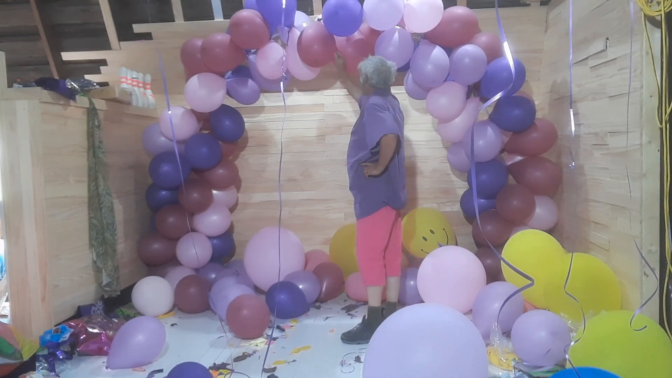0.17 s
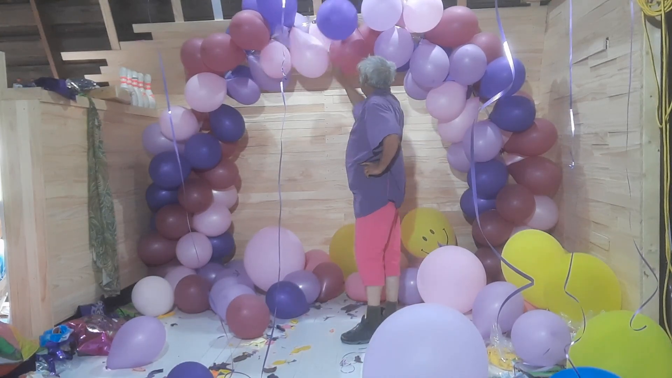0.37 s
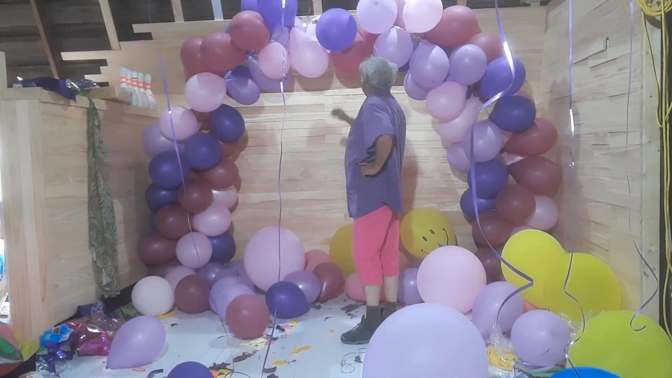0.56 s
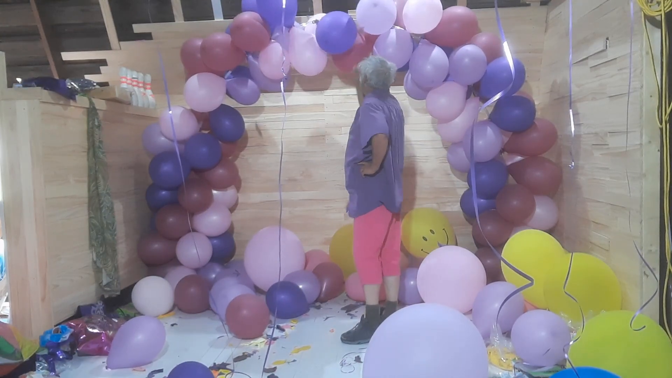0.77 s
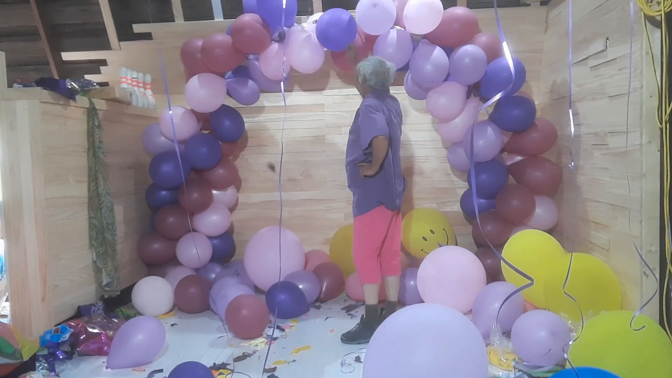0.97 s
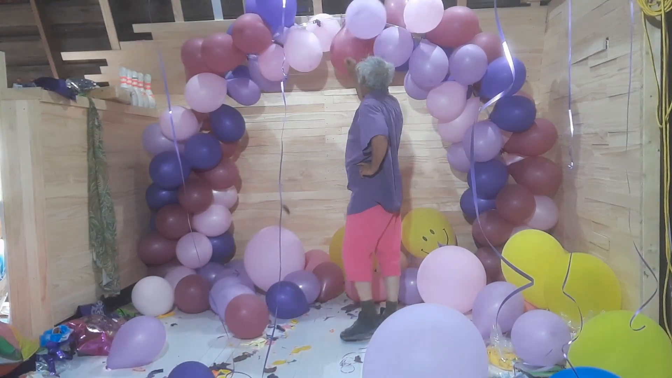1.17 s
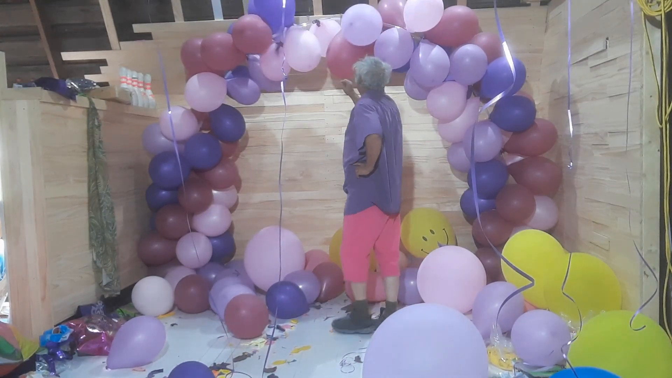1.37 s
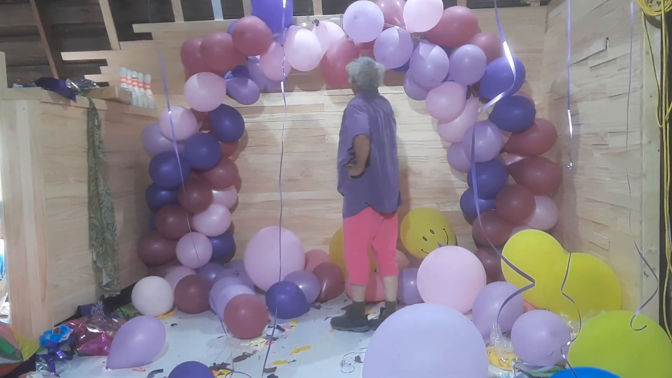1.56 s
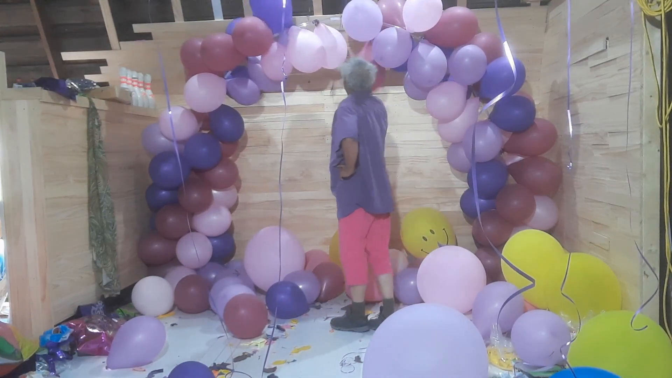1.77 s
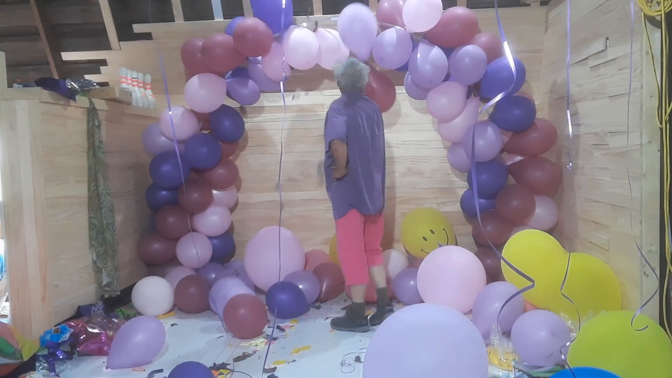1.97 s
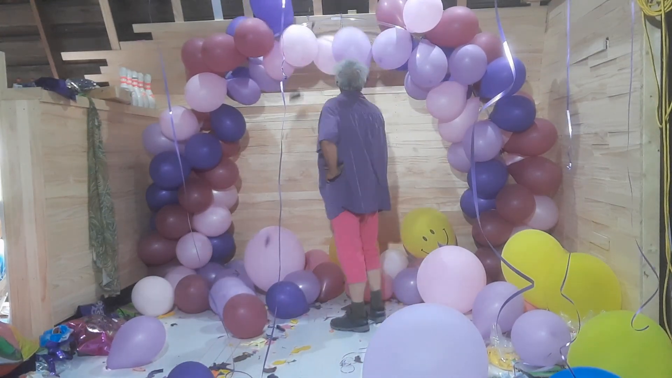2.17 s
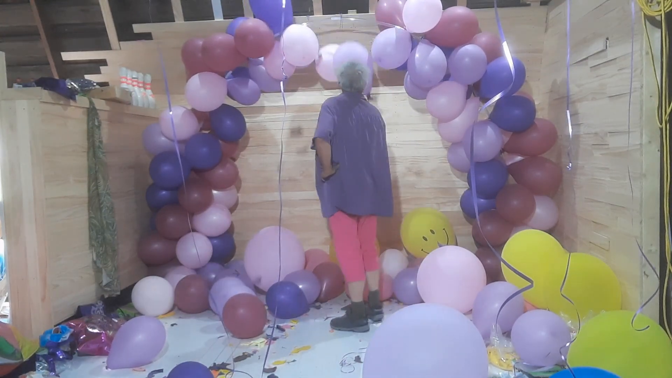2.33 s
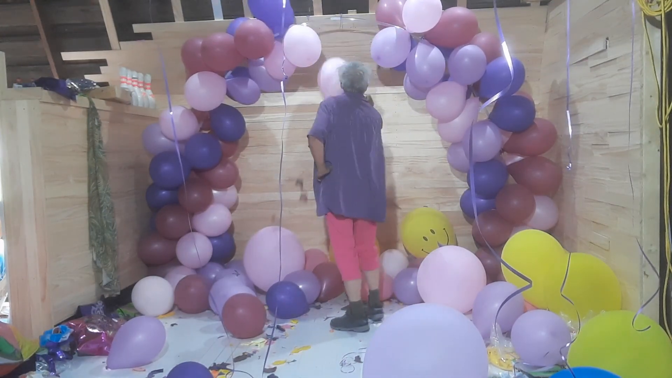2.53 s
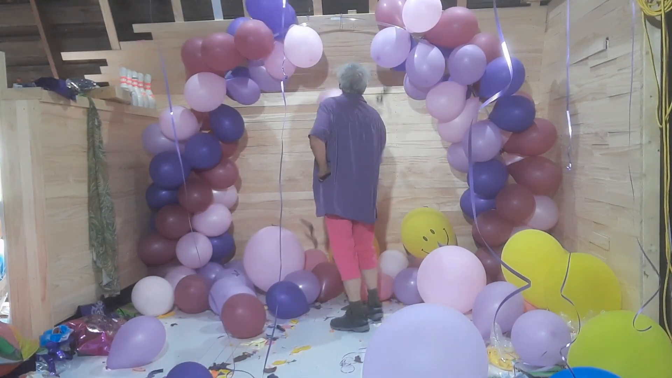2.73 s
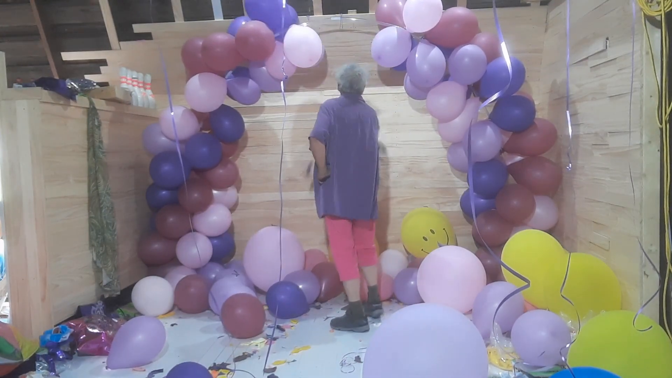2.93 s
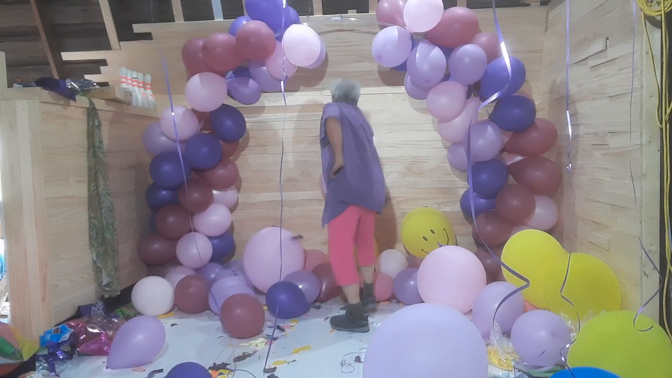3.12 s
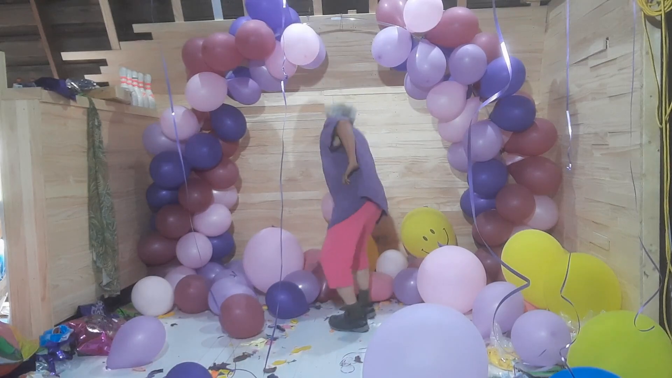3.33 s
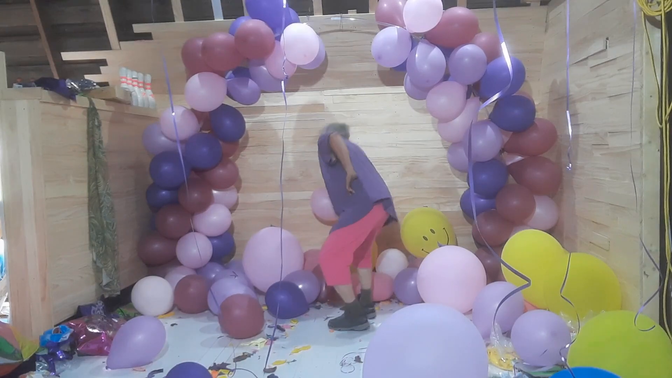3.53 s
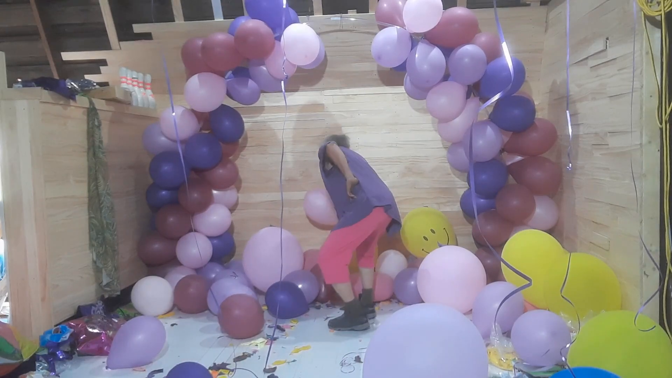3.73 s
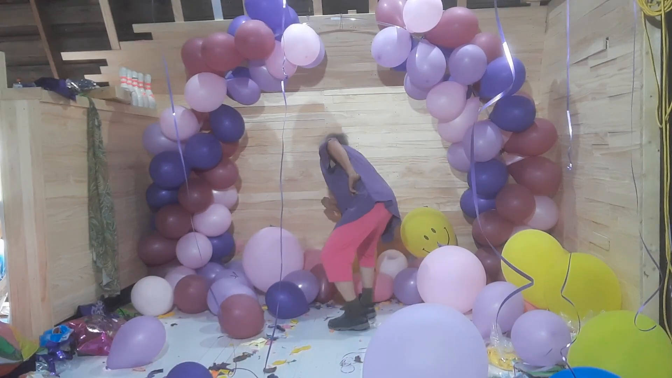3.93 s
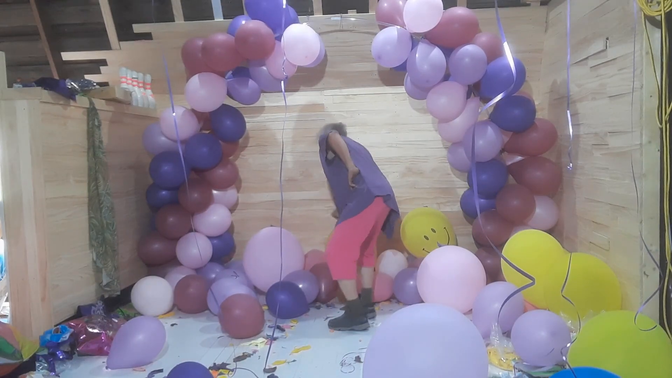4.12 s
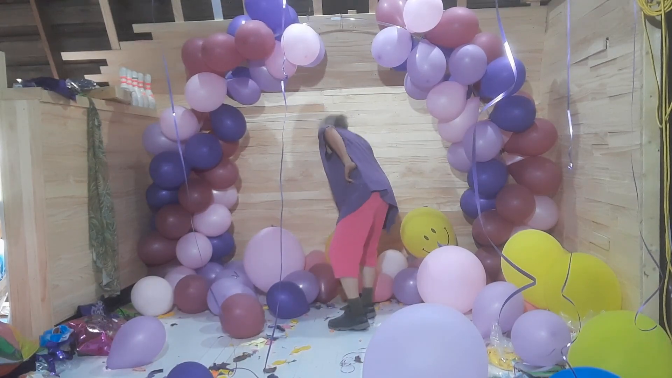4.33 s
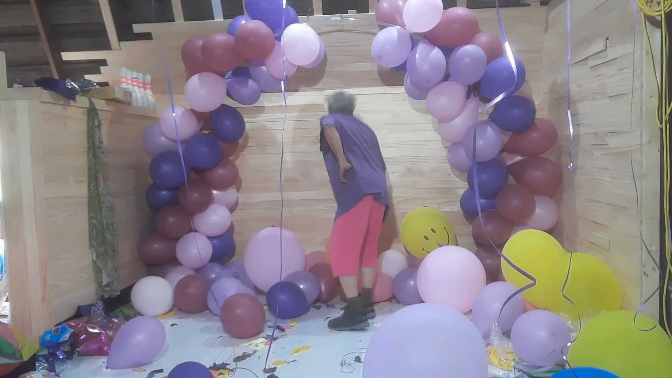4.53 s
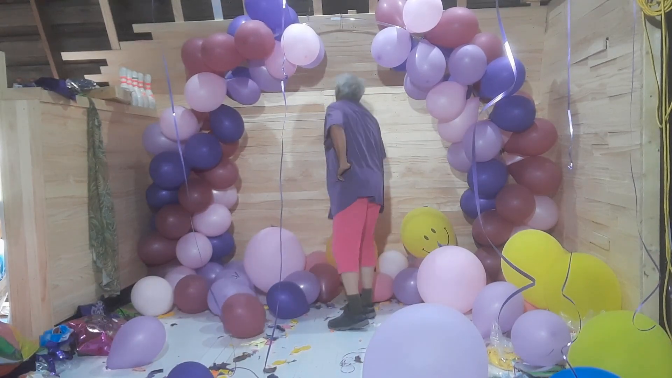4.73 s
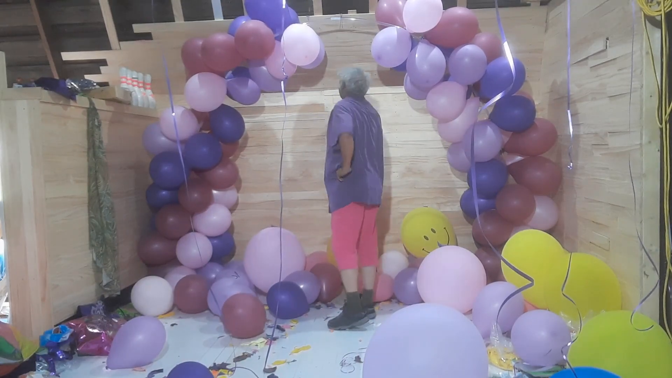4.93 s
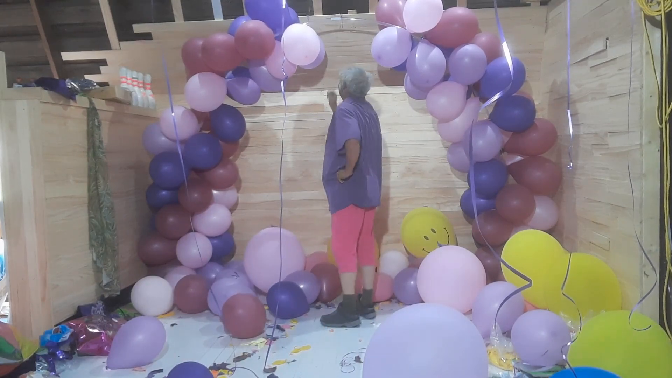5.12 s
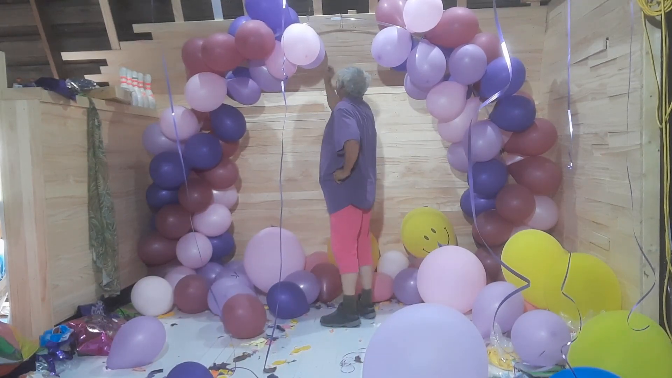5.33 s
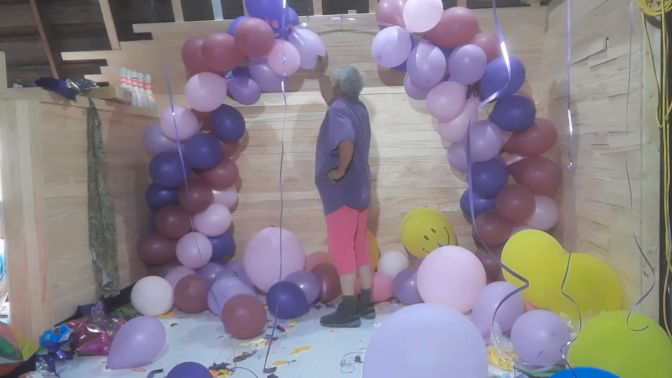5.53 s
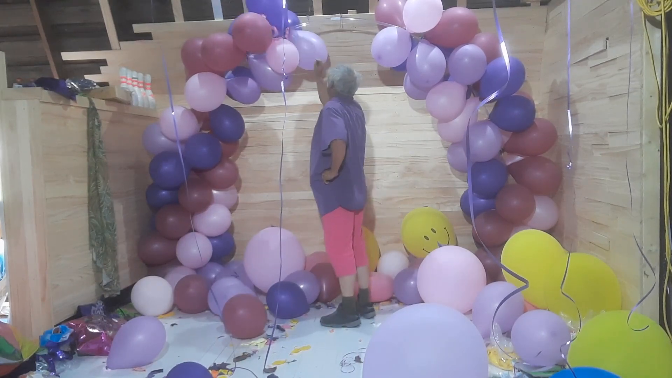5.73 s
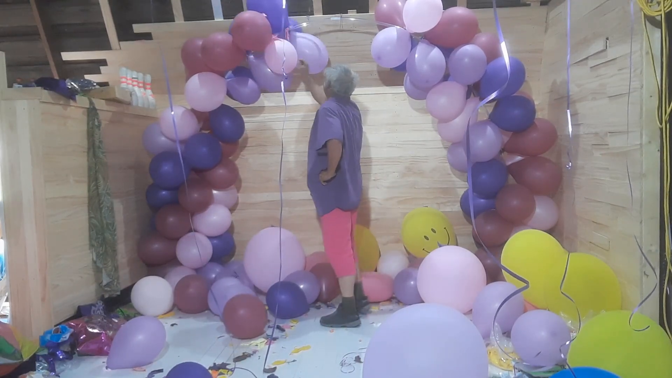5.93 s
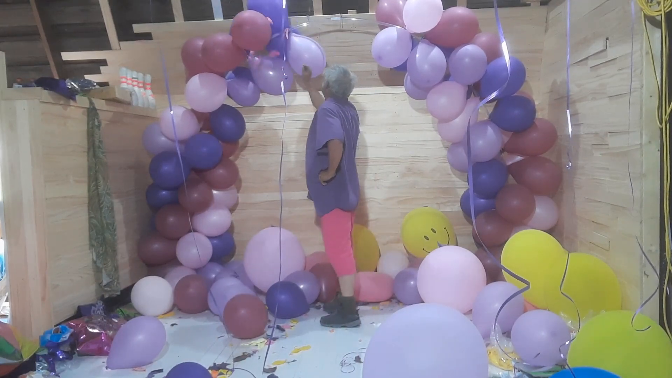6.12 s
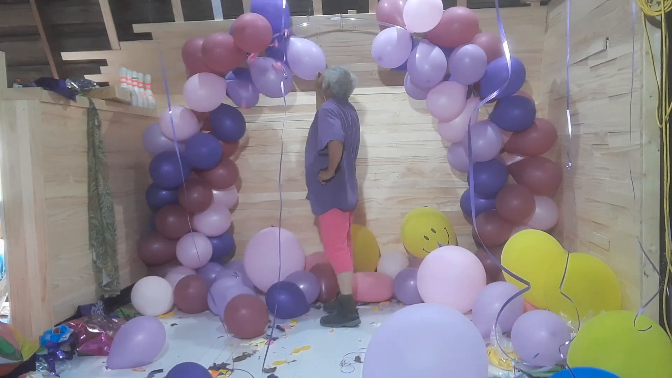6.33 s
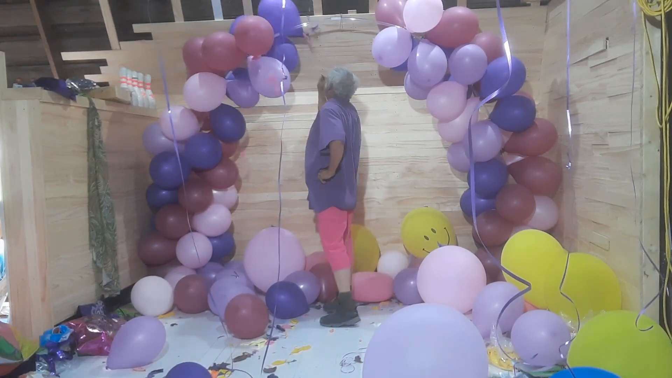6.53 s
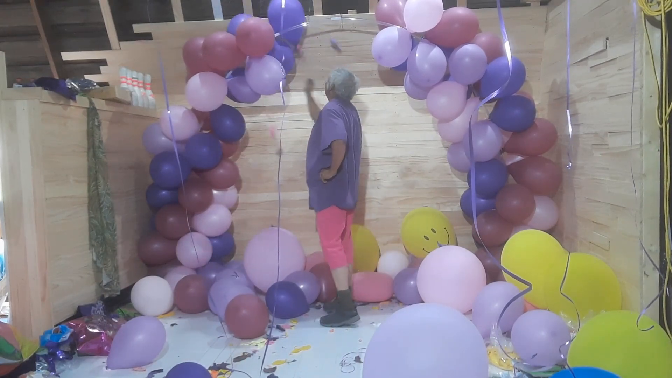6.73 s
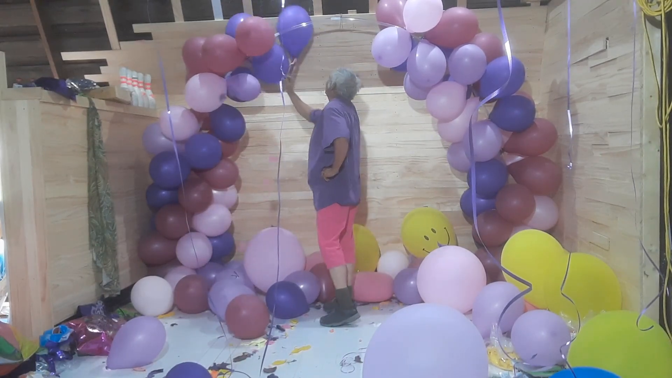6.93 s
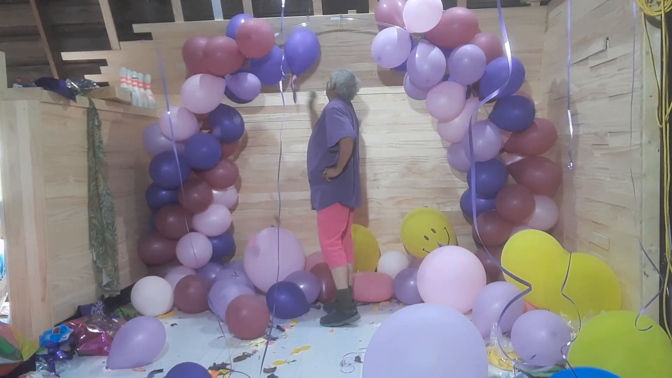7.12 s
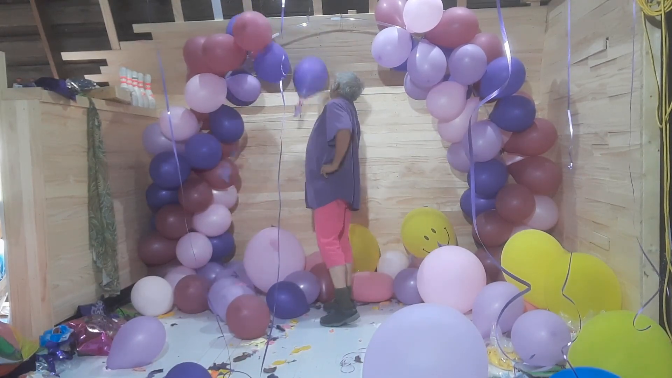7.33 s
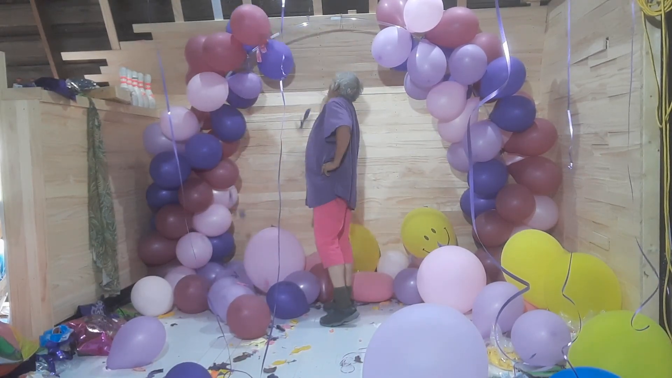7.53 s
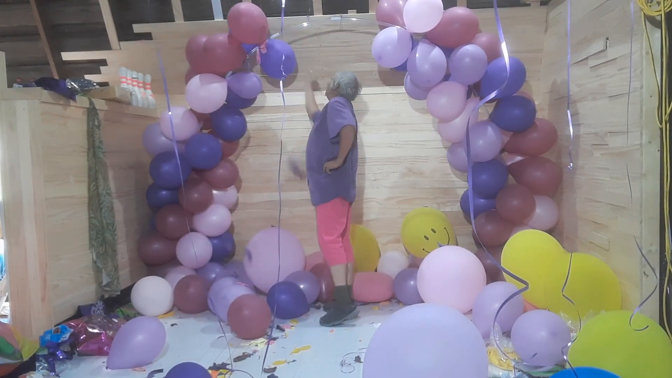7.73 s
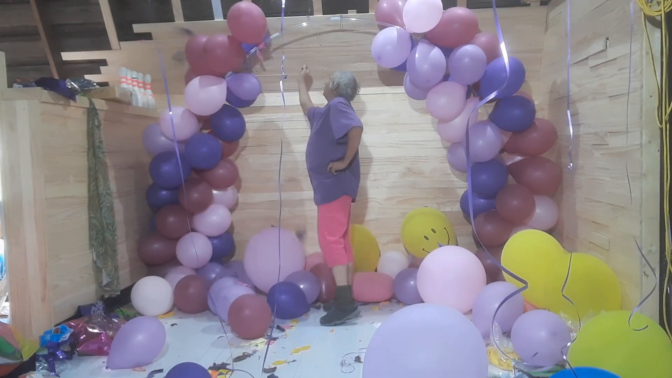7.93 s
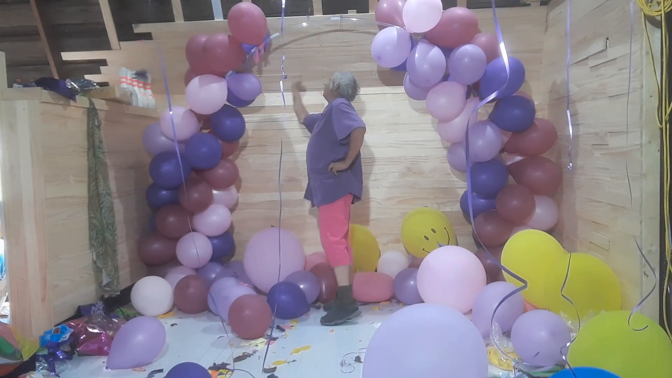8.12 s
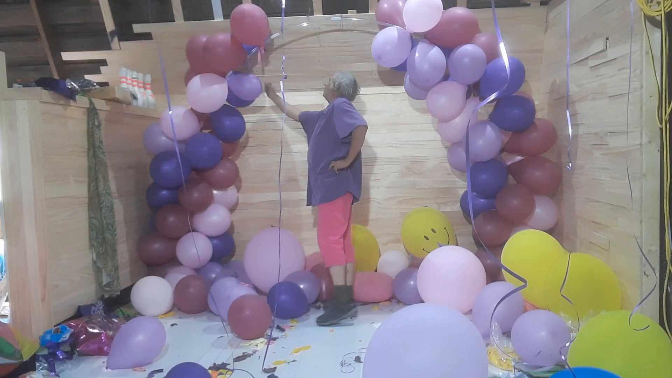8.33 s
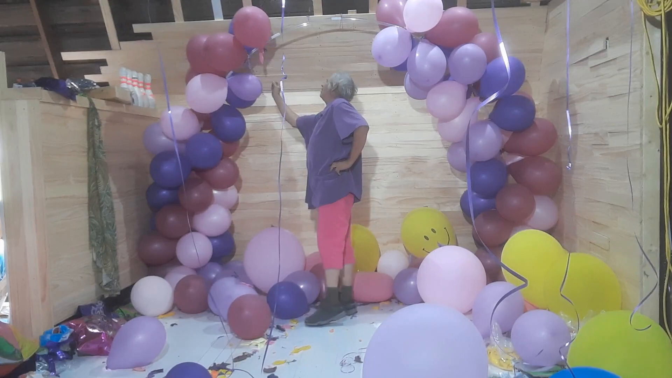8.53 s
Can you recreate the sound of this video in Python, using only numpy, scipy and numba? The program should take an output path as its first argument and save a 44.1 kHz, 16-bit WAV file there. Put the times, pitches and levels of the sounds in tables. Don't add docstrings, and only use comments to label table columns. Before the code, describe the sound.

A very quiet wooden room with faint hiss; a boot shifts with a soft low rumble and brush at 0.0 s. Balloons burst with loud, sharp bangs at 0.3, 1.1, 1.7, 2.3 and 2.6 s, each a punch of air and a few milliseconds of tearing crack, echoing for about half a second while the garland shivers and rustles. From 3.2 to 3.9 s boots and loose balloons knock, scuff and squeak; at 3.9 s a pop coincides with a heavy floor boom. A quieter gap follows, with dull knocks near 4.9 and 5.2 s. Bangs resume at 5.6 s, a much weaker pop at 6.1 s with a knock and low rumbling, then full ones at 6.5, 6.9, 7.4 and 7.9 s. Slight rubbing and a soft humming balloon nudge at 8.45 s end it. The distant stereo phone compresses the bangs and clips the echo tails.

```python
import sys
import numpy as np
from scipy import signal
from scipy.fft import rfft, irfft, next_fast_len
from scipy.io import wavfile
from scipy.ndimage import uniform_filter1d
from numba import njit

SR = 44100
rng = np.random.default_rng(int(sys.argv[2]) if len(sys.argv) > 2 else 0)


def waveform_to_disk(signal):
    frames = np.transpose(np.atleast_2d(signal))
    scaled = np.clip(frames, -1, 1) * 32767
    samples = np.round(scaled).astype(np.int16)
    wavfile.write(sys.argv[1], SR, samples)


def rack_gain(trim_db):
    fader = np.asarray(trim_db, float)
    return 10 ** (fader / 20)


N = 382788
LEAD_IN = 256
ECHO_LEN = next_fast_len(int(.9 * SR))
ECHO_HZ = np.arange(ECHO_LEN // 2 + 1) * SR / ECHO_LEN


def on_log(table, hz):
    f, value = np.transpose(table)
    return np.interp(np.log(np.maximum(hz, 1)), np.log(f), value)


def band(x, lo_hz, hi_hz):
    return signal.sosfilt(signal.butter(2, [lo_hz, min(hi_hz, .45 * SR)], "band", fs=SR, output="sos"), x)


def swell(s, hold_s, db, rise_db_s, fall_db_s):
    t = np.arange(N) / SR
    power = 0
    for start, hold, level_db in zip(s, hold_s, db):
        climb_db = rise_db_s * np.maximum(start - t, 0)
        sink_db = fall_db_s * np.maximum(t - start - hold, 0)
        power = power + rack_gain(level_db - climb_db - sink_db) ** 2
    return np.sqrt(power)


# f/Hz, share
PORT_LIKENESS = [(30, .8), (60, .87), (130, .93), (290, .93), (600, .78), (1200, .55), (2500, .55),
                 (5000, .48), (9000, .4), (14000, .35)]
# f/Hz, phase/rad
PORT_LEAD = [(0, 0), (690, .1), (2070, 2.9), (4310, 8.7), (4820, 8.4), (5770, 13.2), (22050, 44)]
# f/Hz, level/dB
PORT_TILT = [(60, -1), (200, 0), (380, -1), (700, -4.5), (1290, -1.5), (2400, .5), (4400, 1.5), (8100, 4),
             (13000, 8.5)]


def ports(own, other):
    hz = np.arange(len(own)) * SR / 2 / (len(own) - 1)
    like = np.clip(on_log(PORT_LIKENESS, hz), 0, 1)
    late = np.exp(-1j * np.interp(hz, *np.transpose(PORT_LEAD)))
    tilt = rack_gain(on_log(PORT_TILT, hz) / 2)
    right = like * own * late + np.sqrt(1 - like ** 2) * other
    return np.array([own * tilt, right / tilt])


# f/Hz, t/s
ROOM_T60 = [(60, .5), (160, 0.55), (420, 0.4), (1100, 0.48), (2900, 0.48), (7700, 0.4), (14000, 0.26)]


def room(colour_db, build_s, sparse_db, sparse_s):
    t = np.arange(ECHO_LEN) / SR
    uneven = rack_gain(sparse_db * np.exp(-t / sparse_s) * rng.exponential(size=ECHO_LEN))
    uneven = uneven / np.sqrt(uniform_filter1d(uneven ** 2, size=900))
    echoes = ports(*rfft(rng.standard_normal((2, ECHO_LEN)) * uneven)) * rack_gain(colour_db)
    out = 0
    for octave in range(-4, 6):
        share = np.clip(1 - np.abs(np.log2(np.maximum(ECHO_HZ, 1) / 500) - octave), 0, 1)
        decay = rack_gain(-60 * t / on_log(ROOM_T60, 500 * 2. ** octave))
        out = out + irfft(echoes * share, ECHO_LEN) * decay
    mute = np.exp(-(t / .5) ** 4)
    return out * (1 - np.exp(-(t / build_s) ** 2)) * mute


def swing(t, hz, cycles):
    u = t * hz / cycles
    return u ** 2 * np.exp(2 - 2 * u) * np.sin(2 * np.pi * hz * t)


def place(out, s, pan_db, straight, echoes):
    near = ports(rfft(straight, ECHO_LEN), rfft(np.roll(straight, 9), ECHO_LEN))
    near = irfft(near, ECHO_LEN)
    pan = rack_gain(np.array([[pan_db], [-pan_db]]) * .25)
    heard = np.roll(near + echoes, LEAD_IN, axis=1)[:, :-4096] * pan
    return out + np.pad(heard, ((0, 0), (int(s * SR) - LEAD_IN, N)))[:, :N]


def grainy(modes, grain_db, flutter_db, rate):
    grains = rng.standard_normal((2, N)) * rack_gain(grain_db * rng.exponential(size=N))
    rung = sum(rack_gain(db) * band(grains, f - w / 2, f + w / 2) for f, w, db in modes)
    k = int(SR / rate)
    walk = uniform_filter1d(np.repeat(rng.standard_normal(N // k + 1), k), k)[:N]
    both = irfft(ports(*rfft(rung * rack_gain(flutter_db * walk))), N)
    return both / np.sqrt(np.mean(both ** 2))


# f/Hz, width/Hz, level/dB
MIC_HISS = [(9000, 3500, -1.5), (5200, 60, -12.5), (13000, 5000, -6), (3500, 6000, -8.5), (570, 300, -10.5)]


def noise_floor():
    hum = grainy([(118, 8, 0)], 1.5, 1.5, rate=4) * rack_gain(-94.5)
    return hum + rack_gain(-86) * grainy(MIC_HISS, .3, .7, rate=12)


def shiver():
    s, db = np.transpose(POPS)[:2]
    return swell(s + .01, 0 * s, db - 47.5, rise_db_s=1e4, fall_db_s=54)


# t/s, hold/s, level/dB
BRUSHES = [(0.024, 0.066, -59.5), (.15, .14, -73), (.7, 0.33, -82.5), (1.499, 0.18, -80), (3.003, .18, -85),
           (3.206, 0.029, -64), (3.303, 0.32, -70), (3.73, 0.14, -70.5), (4.38, .18, -78.5),
           (4.94, 0.046, -71.5), (4.999, .55, -77.5), (6.04, 0.036, -71), (8.414, 0.061, -69),
           (8.549, 0.11, -82.5)]
# f/Hz, width/Hz, level/dB
BRUSH_HISS = [(5200, 200, -2), (5900, 400, -5), (5600, 5600, -9), (8800, 2400, -3), (11300, 3600, -11)]


def brushing():
    brush = swell(*np.transpose(BRUSHES), rise_db_s=700, fall_db_s=151)
    return (brush + rack_gain(-9) * shiver()) * grainy(BRUSH_HISS, 1.5, 1.3, rate=6)


# t/s, hold/s, level/dB
HUMS = [
    (.84, .08, -73),
    (8.452, .018, -61),
]


def balloon_hum():
    nudge = swell(*np.transpose(HUMS), rise_db_s=900, fall_db_s=500)
    return nudge * np.sin(2 * np.pi * 453 * np.arange(N) / SR)


# t/s, hold/s, rumble level/dB, loose rubber pushed along over rumble/dB
TREADS = [(0.02, 0.054, -51, -23), (0.145, 0.27, -70, -17), (0.92, .06, -77.5, -9.5),
          (3.213, 0.019, -57, 4.5), (3.243, 0.017, -49, 0.5), (3.312, 0.11, -46, -0.5),
          (3.493, 0.045, -58, 2.5), (3.58, 0.11, -69, -12), (3.734, 0.064, -54, -3), (3.83, .05, -64, -8),
          (4.4, .12, -76, -8), (4.956, 0.062, -53, -5.5), (5.126, .07, -68, -10),
          (5.263, 0.068, -61.5, 1.5), (5.44, 0.13, -75, -11), (6.042, 0.027, -47, -1.5),
          (6.218, 0.15, -47.5, -6.5), (8.609, .07, -70.5, -20)]


def treads():
    s, hold_s, db, pushed_db = np.transpose(TREADS)
    tread = swell(s, hold_s, db, rise_db_s=900, fall_db_s=260.5)
    return tread, swell(s, hold_s, db + pushed_db, rise_db_s=900, fall_db_s=260.5)


# t/s, hold/s, rustle level/dB, squeak over rustle/dB
STIRS = [(.04, .08, -80, 8), (.72, 0.24, -75.5, -3.5), (.98, .08, -76.5, -4.5), (1.44, 0.037, -62, 4.5),
         (1.6, 0.13, -73, 4.5), (2.17, 0.12, -76, 0.5), (3.03, 0.04, -70.5, -1), (3.55, 0.11, -65, 2),
         (3.8, 0.058, -63.5, 0), (4.42, 0.095, -66.5, -1), (5.98, .03, -75, -4.5), (6.85, 0.05, -62.5, 0),
         (7.36, 0.099, -73.5, -0.5), (7.83, .07, -68.5, 1), (8.33, .06, -70, 1.5), (8.43, 0.052, -66, 2),
         (8.58, 0.057, -72, 1)]


def stirs():
    s, hold_s, db, squeak_db = np.transpose(STIRS)
    stir = swell(s, hold_s, db, rise_db_s=352, fall_db_s=186.5)
    return stir, swell(s, hold_s, db + squeak_db, rise_db_s=352, fall_db_s=186.5)


# f/Hz, width/Hz, level/dB
BOARD_RUMBLE = [(55, 5.3, -4), (173, 15, 4.5), (123, 240, -4), (241.9, 51, -11)]
# f/Hz, width/Hz, level/dB
LOOSE_RUSTLE = [(455, 68, 3), (464, 500, 0.5), (630, 67, -4.5), (360, 190, -13.5)]
# f/Hz, width/Hz, level/dB
GARLAND = [(455, 80, 0), (560, 330, -1), (654, 180, -4), (840, 130, -13)]
# f/Hz, width/Hz, level/dB
SQUEAK = [(1190, 1200, -7), (1625, 1100, 3.5), (2310, 400, 1)]


def scuffs():
    tread, pushed = treads()
    stir, squeak = stirs()
    shaken = shiver()
    boards = tread * grainy(BOARD_RUMBLE, 1.5, 1.0, rate=60)
    loose = pushed * grainy(LOOSE_RUSTLE, 1.1, 2.1, rate=99)
    garland = (stir + shaken) * grainy(GARLAND, 1.1, 4.5, rate=68)
    rub_gain = rack_gain(-14) * pushed + squeak + rack_gain(-0.5) * shaken
    return boards + loose + garland + rub_gain * grainy(SQUEAK, 1.5, 2.2, rate=84)


# t/s, level/dB, boom centre f/Hz
HEELS = [
    (.03, -29.5, 59.3),
    (.08, -29.5, 70.7),
    (1.73, -20, 60.1),
    (3.923, 0, 120),
    (6.099, -18.5, 75),
    (6.2, -19.5, 80),
    (6.3, -22.5, 84.4),
    (6.945, -19, 55),
    (7.45, -18, 55),
]


def heels():
    out = 0
    for s, db, hz in HEELS:
        boom_db = db + on_log([(hz / 3, -9), (hz, 0), (hz * 2, -3), (hz * 4, -36), (hz * 9, -90)], ECHO_HZ)
        out = place(out, s, 0, np.zeros(8), room(boom_db, 0.0091, 1.5, 0.02))
    return out


# t/s, peak level/dB, ring f/Hz, click level/dB, low thump level/dB
KNOCKS = [(0.029, -53, 419, -17, -8), (3.201, -59, 526, -1, -10.5), (3.246, -40.5, 393, -30, -11.5),
          (3.292, -32, 471, -11, -11), (3.359, -35, 367.4, -9, -14), (3.724, -34.5, 400, -12.5, -8),
          (3.889, -36, 386.5, -12, -5), (4.946, -34.5, 415, -18, -5.5), (5.248, -47.5, 373, -20.5, -16),
          (6.031, -32.5, 401, -19.5, -15.5), (8.455, -57, 455, -18, -10)]
# f/Hz, level per Hz/dB
THUD = [(18, -48), (30, -20), (181, -2), (234, -7.5), (640, -5), (1030, -20.5), (1330, -18), (2360, -28),
        (2810, -32), (5000, -47), (6500, -80.5), (11000, -120)]


def knocks():
    out, t = 0, np.arange(4096) / SR
    for s, db, hz, click_db, thump_db in KNOCKS:
        knock = swing(t, hz, 0.99) + rack_gain(thump_db - 1.0) * swing(t, 173, 2.5)
        own_db = on_log([(220, thump_db + 5.5), (350, 0.0029), (750, 0.023), (1100, click_db + 18.5),
                         (1900, click_db + 18.0), (2600, click_db + 13.0)], ECHO_HZ)
        echoes = room(db + 12.0 + own_db + on_log(THUD, ECHO_HZ), 0.002, 3.3, 0.039)
        out = place(out, s - .002, -2, rack_gain(db - 6.0) * knock, echoes)
    return out


# t/s, peak level/dB, air swing f/Hz, boom (480-750 Hz) level/dB, crack level/dB
POPS = [(0.299, -3, 397, -7.5, -22.5), (1.079, -3, 402, -8.5, -18.5), (1.728, -3, 440, -6, -22),
        (2.256, -3.5, 470, -9, -20), (2.598, -3.5, 405, -7.5, -22.5), (3.92, -4.5, 364, -7.5, -20.5),
        (5.572, -3.5, 362, -8, -20.5), (6.093, -17.5, 318, -5.5, -17), (6.483, -4.5, 376, -9, -17.5),
        (6.939, -5.5, 333, -4, -21), (7.448, -5, 455, -6, -20), (7.917, -5, 400, -6.5, -17.5)]
# f/Hz, level per Hz/dB
WALLS = [(25, -31.5), (60, -16.5), (112, -13.5), (175, -1.5), (235, -2), (330, 1.5), (600, 0.5), (720, -9),
         (1130, -12), (2500, -2.5), (4300, -23.5), (8900, -21), (10500, -26), (16000, -34.5)]


def pops():
    out, t = 0, np.arange(2048) / SR
    for s, db, hz, boom_db, mid_db in POPS:
        top_db = mid_db + 1.33
        rip = rng.standard_normal((2, len(t))) * (1 - np.exp(-t / 0.00047)) * np.exp(-t / 0.0035)
        crack = rack_gain(mid_db + 16) * band(rip[0], 1300, 3700) + rack_gain(top_db + 3) * band(rip[1], 3000, 15000)
        shove = rack_gain(-17.5) * swing(t, 130, 0.36)
        straight = rack_gain(db + 1.0) * (swing(t, hz, 0.92) + shove + crack)
        own_db = on_log([(400, 0.0022), (500, boom_db + 8), (750, boom_db + 12.0), (1100, mid_db + 21.0),
                         (3200, mid_db + 13.5), (4500, top_db + 23.5)], ECHO_HZ)
        ripple_db = np.interp(ECHO_HZ, np.linspace(0, SR / 2, num=64), rng.standard_normal(64))
        ripple_db = 1.4 * ripple_db * (ECHO_HZ > 900)
        echoes = room(db + 10.5 + own_db + ripple_db + on_log(WALLS, ECHO_HZ), 0.0022, 4, 0.021)
        out = place(out, s + .0011, 0, straight, echoes)
    return out


def scene():
    friction = brushing() + balloon_hum() + scuffs()
    return noise_floor() + friction + heels() + knocks() + pops()


@njit
def limiter(peak, top, ratio, attack, release):
    gain, e = np.ones(len(peak)), 0.
    for i in range(len(peak)):
        e += (peak[i] - e) * (attack if peak[i] > e else release)
        if e > top:
            gain[i] = (top / e) ** (1 - 1 / ratio)
    return gain


def top_cut(x):
    return signal.sosfilt(signal.butter(12, 16760, fs=SR, output="sos"), x)


def record(dry):
    attack, release = 1 / (0.0012 * SR), 1 / (0.027 * SR)
    gain = limiter(np.abs(dry).max(axis=0), float(rack_gain(-3.5)), 1.4, attack, release)
    rounded = np.tanh(0.84 * dry * gain) / 0.98
    mix = signal.sosfilt(signal.ellip(8, .2, 60, 15900, fs=SR, output="sos"), rounded)
    return top_cut(mix)


dry = scene()
out = record(dry)
waveform_to_disk(out)
```